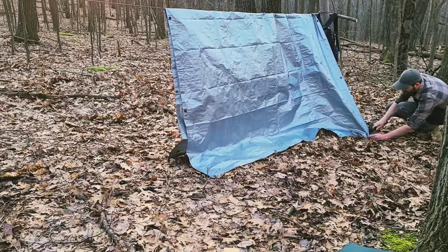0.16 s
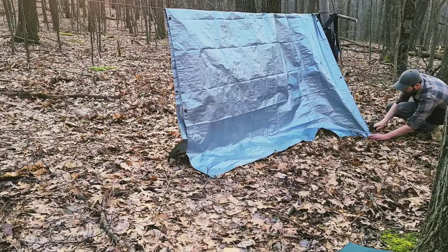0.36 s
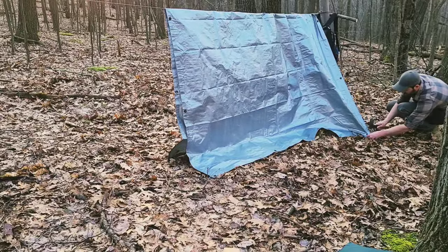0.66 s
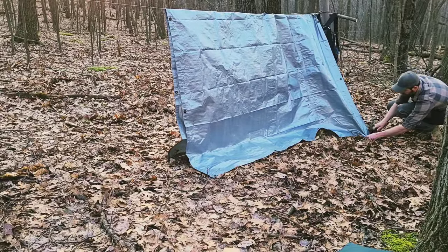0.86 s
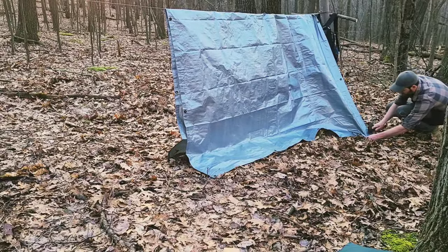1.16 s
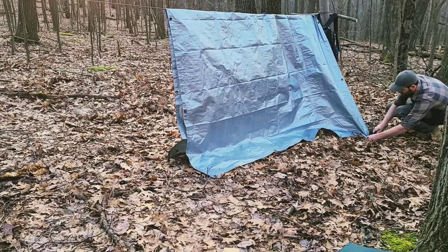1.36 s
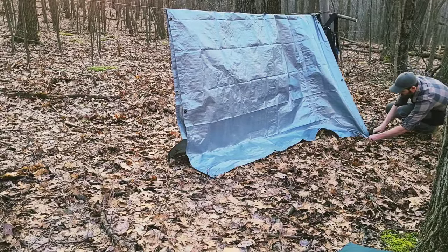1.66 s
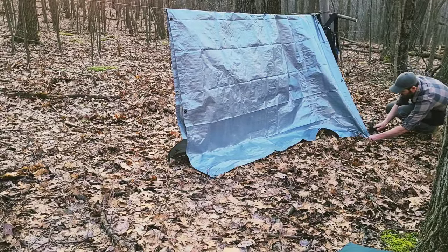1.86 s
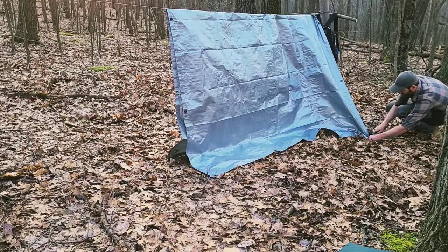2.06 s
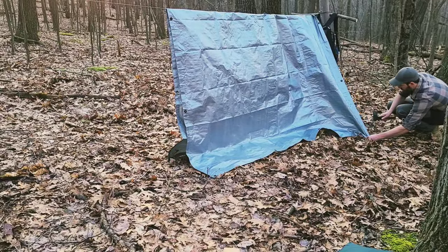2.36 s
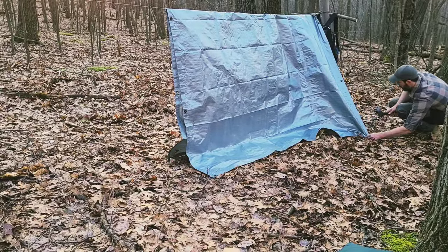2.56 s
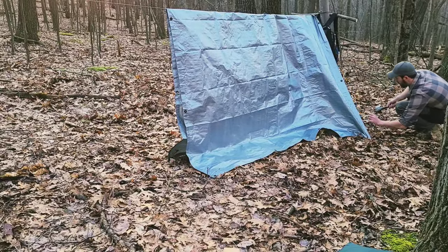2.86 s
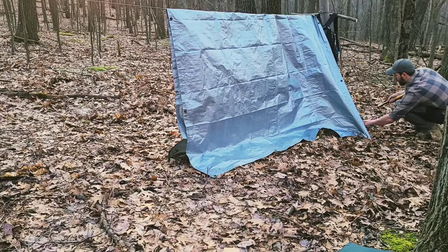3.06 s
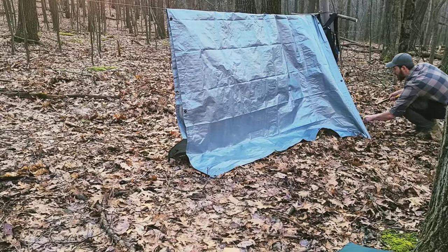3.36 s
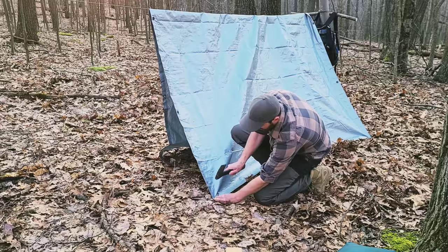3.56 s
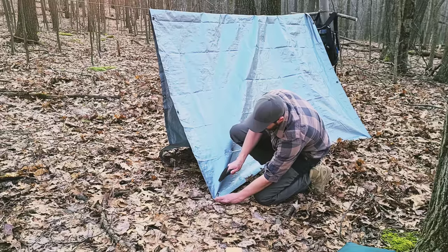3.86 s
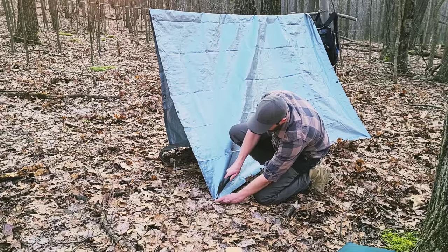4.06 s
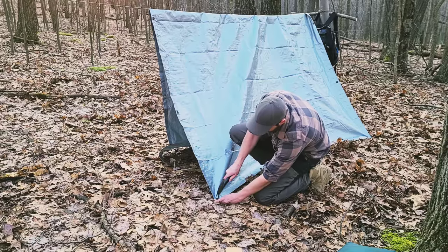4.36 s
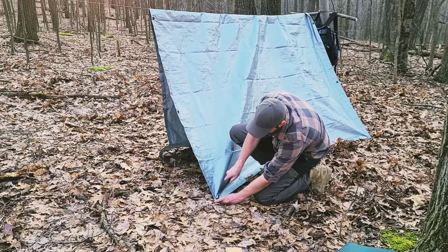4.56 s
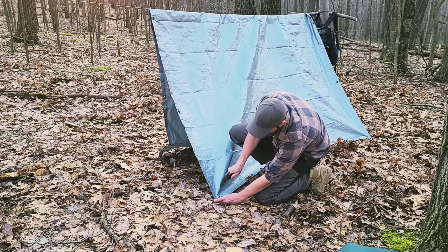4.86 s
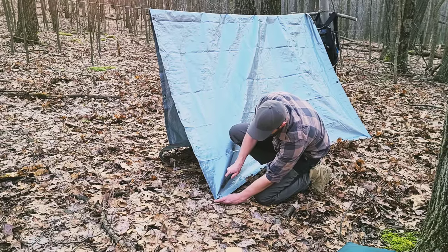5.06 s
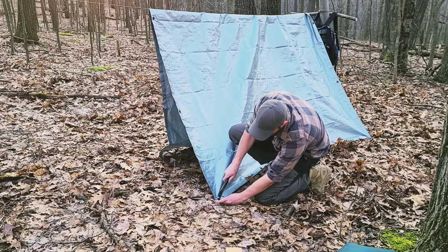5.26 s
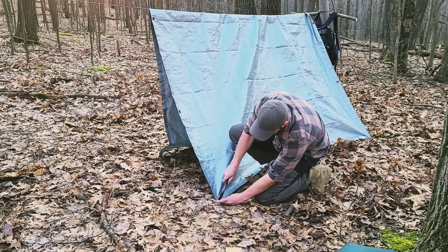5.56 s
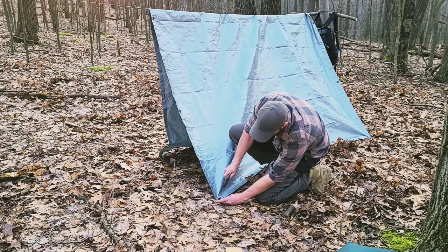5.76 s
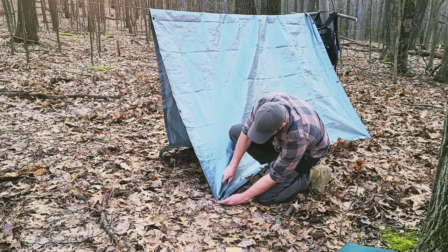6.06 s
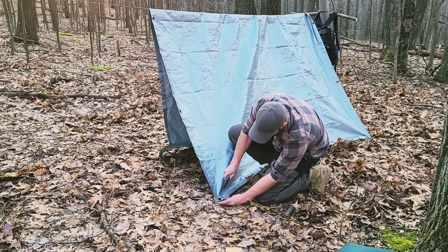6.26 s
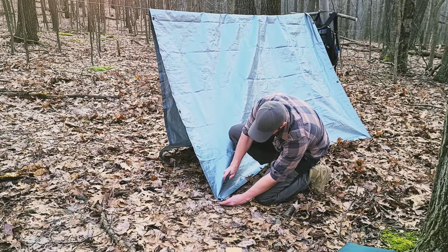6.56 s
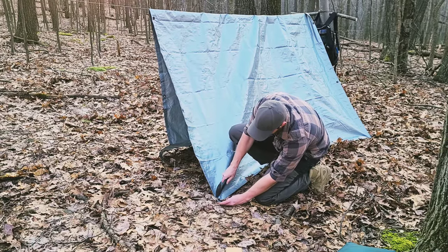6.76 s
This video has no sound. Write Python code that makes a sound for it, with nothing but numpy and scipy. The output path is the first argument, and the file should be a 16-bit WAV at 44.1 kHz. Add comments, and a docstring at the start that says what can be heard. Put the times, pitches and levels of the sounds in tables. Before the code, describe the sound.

A hatchet hammers two metal stakes into the ground outdoors, hard ringing clacks first, then nearer earthy knocks, with dry leaf rustle and light wind.

```python
"""On a leafy forest floor the back of a hatchet drives in two metal tarp stakes, a far one on the right, then a near one.
Each blow is chattering contact noise that excites damped modes: a clack, a bright edge, a dull knock and a faint ring.
Slow wave packets thump in the soil; decaying noise is the scatter from the ground and the tree trunks.
Uneven noise grains rustle as dry leaves, and low filtered noise is a light breeze buffeting the microphone."""
import sys
import numpy as np
from scipy import signal
from scipy.fft import rfft, irfft
from scipy.io import wavfile

SR = 44100
rng = np.random.default_rng(int(sys.argv[2]) if len(sys.argv) > 2 else 0)


def wav_out(sig):
    """Save sig, one row per channel (or a flat mono array), as 16-bit PCM at SR to the path in sys.argv[1]."""
    wavfile.write(sys.argv[1], SR, np.round(np.clip(np.atleast_2d(sig).T, -1, 1) * 32767).astype(np.int16))


N = 304731  # length of the scene in samples
T = np.arange(2 ** 14) / SR  # time axis of one short sound [s]
NEAR_FROM_S = 3.45  # blows before this fall on the far stake, later ones on the near stake
FIRM_FORCE_DB = -26  # force of a firm blow, to which the bright parts refer
DIRECT_WIDTH = .25  # side over mid of the contact noise and the ground scatter


# hatchet blows; the stake's resonances shift as it sinks, and the soil resists more or less:
# (time [s], knock [Hz], stake [Hz], edge [Hz], force [dB], knock [dB], ground scatter [dB],
# soil thump [dB], ring [dB]); levels are references that each layer offsets
HATCHET_BLOWS = [(0.1615, 2150, 3085, 5250, -23.5, -40, -50, -46, -46.5),
                 (0.4704, 927, 2750, 5950, -23, -27.5, -30.5, -42, -40),
                 (0.7896, 1800, 2560, 6660, -53.5, -58, -48.5, -54, -55),
                 (1.1326, 1230, 3040, 5830, -29.5, -43, -36.5, -43.5, -46),
                 (1.4308, 1176, 2750, 6140, -21.5, -23.5, -28.5, -34, -46),
                 (1.7527, 1720, 3230, 6180, -17.5, -23, -24.5, -35.5, -38.5),
                 (2.0942, 1340, 2960, 7010, -18, -22, -29, -33.5, -56),
                 (2.7968, 1006, 3490, 6500, -56, -58.5, -66.5, -55, -79),
                 (4.0709, 1270, 3345, 6160, -26.5, -35.5, -50, -31, -63),
                 (4.3499, 1340, 2930, 4330, -24.5, -33, -46, -33, -61),
                 (4.6528, 1780, 3440, 5880, -21, -27, -40, -28, -52.5),
                 (5.0304, 1450, 3730, 5730, -46, -45, -64, -39.5, -82.5),
                 (5.262, 1820, 3400, 6020, -29, -29, -38.5, -33.5, -63.5),
                 (5.571, 1365, 2950, 5000, -24, -35.5, -45.5, -34.5, -51),
                 (5.931, 1714, 3270, 5320, -46.5, -49, -68, -43.5, -69),
                 (6.1452, 2070, 3300, 4700, -25, -33, -45, -36.5, -50.5),
                 (6.431, 2030, 2730, 4020, -24.5, -33, -42, -34, -55),
                 (6.723, 1335, 3540, 6320, -26, -27, -34, -44, -48)]


def hammering():
    """Superposition: the blows on both stakes add up."""
    out = np.zeros((2, N))
    for s, *settings in HATCHET_BLOWS:
        far = s < NEAR_FROM_S
        add(out, s, place(blow(far, *settings), far))
    return out


def blow(far, knock_hz, stake_hz, edge_hz, force_db, knock_db, scatter_db, thump_db, ring_db):
    """Impact excitation: one blow drives the stake, the handle and the soil, and its echoes follow."""
    above_firm_db = force_db - FIRM_FORCE_DB
    strike = contact(0.0038, 0.00063)
    push = contact(0.0066, 0.000083)
    direct = clack(strike, stake_hz, force_db) + bright_edge(strike, edge_hz, above_firm_db)
    direct = direct + dull_knock(push, knock_hz, knock_db) + handle(push, thump_db)
    echoes = ground_scatter(scatter_db) + trunk_scatter((force_db + knock_db) / 2)
    return direct + echoes + steel_ring(far, edge_hz, ring_db, above_firm_db) + thump(thump_db)


def contact(length_s, rise_s):
    """Broadband excitation: steel chatters on the stake head and excites all pitches about equally."""
    window = (1 - np.exp(-T / rise_s)) * np.exp(-(T / length_s) ** 2)
    chatter = rfft(rng.standard_normal((2, len(T))) * window)
    flatter = irfft(chatter / np.abs(chatter) ** .5)  # square root of the magnitudes
    mid, side = flatter * np.exp(-(T / (3 * length_s)) ** 2)
    return np.array([mid + DIRECT_WIDTH * side, mid - DIRECT_WIDTH * side])


def clack(strike, stake_hz, force_db):
    """Modal resonance: the strike excites two bending resonances of the stake."""
    resonances = modes([(stake_hz, 0, .024), (3158, -3, .011)])
    sound = burst(drive(strike, resonances), force_db + 0.5)
    return colour(sound, [(500, -11.5), (2000, 1.0), (3000, -0.5), (6000, 3.5)])


# spectrum of the bright edge: (frequency [Hz], level [dB])
EDGE_SPECTRUM = [(2500, -52.5), (4000, 3.5), (4800, 6.5), (6800, 3), (8000, -6.5), (9000, -14.5),
                 (11500, -5.5), (15500, -13)]


def bright_edge(strike, edge_hz, above_firm_db):
    """Hard contact: steel on steel gives a bright crack with one high resonance."""
    edge_db = 0.75 * above_firm_db  # growth in dB per dB of force
    sizzle = scatter(.002, .12, 1.0, 2.3)  # the crack's sizzle in the leaves
    crack = colour(contact(0.005, 0.00027) + 0.041 * sizzle, EDGE_SPECTRUM)
    resonance = colour(drive(strike, modes([(edge_hz, 0, .014)])), EDGE_SPECTRUM)
    return burst(crack, edge_db - 29.5) + burst(resonance, edge_db - 32)


# spectrum of the knock: (frequency [Hz], level [dB])
KNOCK_SPECTRUM = [(100, -29), (280, -11.5), (520, -16), (900, -6.5), (1500, -5.5), (2200, -6), (4000, -8.5),
                  (10000, -37.5)]


def dull_knock(push, knock_hz, knock_db):
    """Damped resonance: the soil's resistance gives a dull knock with one broad resonance."""
    resonance = drive(contact(0.0018, 0.00035), modes([(knock_hz, 0, .02)]))
    body = burst(colour(push, KNOCK_SPECTRUM), knock_db - 2)
    return body + burst(colour(resonance, KNOCK_SPECTRUM), knock_db - 4.5)


# modes of the hatchet's wooden handle: (frequency [Hz], level [dB], t60 [s])
HANDLE_MODES = [(380, -4.5, 0.0095), (736, 1.5, 0.014)]


def handle(push, thump_db):
    """Modal resonance: the push excites the handle's damped modes."""
    return burst(drive(push, modes(HANDLE_MODES)), thump_db - 7)


# waves in the soil, the shorter ones arrive later:
# (frequency [Hz], level [dB], arrival [s], length [s])
SOIL_WAVES = [(69, -5, 0.018, 0.014), (116, 1.5, 0.019, 0.005), (209.6, -9, 0.022, 0.011)]


def thump(db):
    """Elastic recoil: the soil gives way and springs back; its waves pass as short swells."""
    waves = 0
    for hz, wave_db, arrival_s, length_s in SOIL_WAVES:
        envelope = np.exp(-((T - arrival_s) / length_s) ** 2)
        waves = waves + undb(wave_db) * envelope * np.cos(2 * np.pi * hz * (T - .017))
    shudder = scatter(0.0042, 0.13, 0.081, 0.73)
    shudder = colour(shudder, [(40, -6.5), (110, 9.5), (230, 0.0), (450, -13.0), (1500, -59.5)])
    return burst(waves * (1 - np.exp(-T / 0.002)), db - 0.7) + burst(shudder, db - 5)


# ring of the steel, completed by each blow's edge resonance: (frequency [Hz], level [dB], t60 [s])
STEEL_MODES = [(2600, -24, .02), (2840, -6, .016), (3402, 5.5, 0.022), (3490, 2.5, 0.0073),
               (3660, -15, .014)]
# overtones that an off-centre blow wakes: (frequency [Hz], level [dB], t60 [s])
STEEL_OVERTONES = [(4940, 11.5, 0.022), (7650, 4, 0.011), (10420, -6, 0.015), (9900, 2.5, 0.026),
                   (9700, -20, .008)]


def steel_ring(far, edge_hz, ring_db, above_firm_db):
    """Free vibration: the steel rings on, its overtones moving a little with the spot that is hit."""
    shift = 1 + 0.026 * rng.standard_normal()
    shifted = [(hz * shift, db, t60) for hz, db, t60 in STEEL_OVERTONES]
    overtones_db = (-63.5 if far else -55.5) + .7 * above_firm_db  # growth in dB per dB of force
    steel = ring(STEEL_MODES + [(edge_hz, -4, .018)], 0.45, ring_db + 5)
    return steel + ring(shifted, 0.38, overtones_db)


def ring(rows, t60, db):
    """Modal resonance and diffusion: modes vary at each touch and smear by reflection among the trees."""
    touched = []
    for hz, mode_db, decay in rows:
        varied_hz = hz * (1 + 0.015 * rng.standard_normal())
        touched.append((varied_hz, mode_db + 2 * rng.standard_normal(), decay))
    return burst(drive(scatter(0.0022, t60, 0.55, 1.1), modes(touched)), db)


# spectrum of the ground's reflections: (frequency [Hz], level [dB])
GROUND_SPECTRUM = [(90, -6), (250, -5.5), (520, -9.5), (1100, -4.5), (1800, -7), (3000, -1), (4500, -16),
                   (7000, -16), (9000, -28.5), (15000, -28.5)]


def ground_scatter(db):
    """Early scattering: the ground close by answers with a short, narrow cloud of reflections."""
    return burst(colour(scatter(0.0096, 0.13, DIRECT_WIDTH, 5.8), GROUND_SPECTRUM), db + 4.5)


# spectrum of the trunks' reflections: (frequency [Hz], level [dB])
TRUNK_SPECTRUM = [(150, -4), (500, -6.5), (1100, -7.5), (2000, -7.5), (3000, 0.5), (4500, -7.5), (7000, -9),
                  (9000, -26), (15000, -27.5)]


def trunk_scatter(db):
    """Late scattering: the tree trunks answer with a longer and wider cloud of reflections."""
    return burst(colour(scatter(0.007, 0.78, 1.0, 4.5), TRUNK_SPECTRUM), db - 19)


def scatter(rise_s, t60, width, grain_db):
    """Diffuse reflection: a cloud of small reflections of uneven size builds up and dies away."""
    grains = noise(len(T), width) * undb(grain_db * rng.standard_normal(len(T)))
    return grains * fade(t60) * (1 - np.exp(-T / rise_s))


# left minus right of the blows at the microphone pair: (frequency [Hz], level difference [dB])
LEFT_OVER_RIGHT = [(60, -1), (1000, -1), (3000, 0), (4800, -0.5), (8000, 6.5), (12000, 2)]
# change of colour from the near stake to the far one, over leaf litter: (frequency [Hz], level [dB])
DISTANCE_COLOUR = [(65, 6), (110, 7.5), (170, -1.5), (400, 1.5), (700, 2.5), (1100, 5.5), (3000, -2),
                   (5500, -0.5), (9000, -8.5), (15000, -6)]
# how far the left microphone leads the right, for each stake: (frequency [Hz], phase [rad])
FAR_LEAD = [(0, 0), (700, -.3), (2500, -1.5), (3600, -2.0), (4600, -4.0), (7500, -6.2), (16000, -6.3)]
NEAR_LEAD = [(0, 0), (700, .03), (3500, .6), (7500, .7), (16000, .3)]


def place(sound, far):
    """Interaural cues: the far stake is recoloured and leads on the right; left is brighter for both."""
    if far:
        sound = colour(sound, DISTANCE_COLOUR)
    hz = np.arange(len(T) // 2 + 1) * SR / len(T)
    lead = np.interp(hz, *np.transpose(FAR_LEAD if far else NEAR_LEAD))
    left = np.sqrt(gains(LEFT_OVER_RIGHT, len(T))) * np.exp(.5j * lead)
    return irfft(rfft(sound) * np.array([left, 1 / left])) * (T < .35)  # ends at 0.35 s


# a stake touches the hatchet: (frequency [Hz], level [dB], t60 [s])
CLINK_MODES = [(2980, 3, 0.022), (3440, -1, 0.012), (3630, -8, .008), (5370, -3, 0.012)]


def clink():
    """Free vibration: a light touch of steel on steel rings briefly."""
    return ring(CLINK_MODES, 0.88, -49.5)


# spectrum of the dry leaves: (frequency [Hz], level [dB])
LEAF_SPECTRUM = [(500, -5.5), (1500, -1.5), (3000, -2), (7000, 3), (8500, -20), (12000, -13), (15000, -19),
                 (16000, -26)]
# leaves and tarp stirred by hands and knees: (time [s], half length [s], level [dB])
LEAF_STIRS = [(0.796, 0.068, -60.5), (1.756, 0.074, -55), (3.224, 0.15, -68), (3.744, 0.056, -59.5),
              (4.908, .06, -69.5), (5.35, 0.073, -82), (6.155, 0.041, -52.5)]


def rustle():
    """Granular noise: a dense crackle of dry leaves swells with each stir."""
    grains = noise(N, 0.93) * undb(7.8 * rng.standard_normal(N))
    stirring = undb(-74.5)  # faint crackle between stirs
    for s, half_s, db in LEAF_STIRS:
        stirring = stirring + undb(db) * swell(s, half_s)
    return level(colour(grains, LEAF_SPECTRUM), 0) * stirring


# twigs, leaves and the stake shifting in the litter:
# (time [s], level [dB], centre frequency [Hz], t60 [s])
LITTER_SNAPS = [(.804, -43, 1430, 0.061), (0.924, -53.5, 1700, 0.033), (0.9396, -54.5, 2890, 0.031),
                (4.295, -59, 1230, .04), (5.3435, -55, 6240, 0.013), (6.078, -57.5, 1140, 0.046),
                (6.133, -47.5, 6000, .045), (6.175, -44, 3800, 0.04), (6.376, -54, 1490, 0.13)]


def snaps():
    """Band-limited impulses: louder snaps in the litter, each a decaying burst around one pitch."""
    out = np.zeros((2, N))
    for s, db, hz, t60 in LITTER_SNAPS:
        snap = colour(scatter(0.00015, t60, 0.57, 8.4), [(hz / 5, -16), (hz, 0), (hz * 4, -16)])
        add(out, s, burst(colour(snap, [(7000, -4.0), (8500, -21.0)]), db))
    return out


# spectrum of the forest's hush: (frequency [Hz], level [dB])
FOREST_SPECTRUM = [(100, -25), (170, -6), (400, -8.5), (643, -17), (778, -14), (872, -13.5), (1540, -13.5),
                   (1980, -18.5), (2170, -17.5), (2840, -11.5), (4390, -22), (7060, -18), (9040, -46),
                   (12300, -27.5), (16000, -31)]


def hush():
    """Stationary noise: the steady hush of the forest."""
    return level(colour(noise(N, 0.65), [(30, -46.5)] + list(FOREST_SPECTRUM)), -63.5)


# spectrum of the wind at the microphone: (frequency [Hz], level [dB])
WIND_SPECTRUM = [(20, -2), (45, 10), (75, 8.5), (110, -3.5), (170, -23), (300, -29.5), (800, -75)]
# strength of the breeze at the microphone, dying down: (time [s], level [dB])
BREEZE_STRENGTH = [(0, -41), (.8, -52.5), (1.15, -40), (1.55, -45.5), (2.05, -45), (2.25, -55),
                   (2.55, -47.5), (3.3, -51.5), (3.55, -57), (6.9, -57.5)]
# gusts on top of it: (time [s], level [dB])
BREEZE_GUSTS = [(.06, -49), (1.061, -30), (2.43, -43.5), (2.92, -39.5), (2.99, -37)]


def breeze():
    """Turbulent pressure: low noise buffets the microphone, with short gusts."""
    strength = undb(curve(BREEZE_STRENGTH))
    for s, db in BREEZE_GUSTS:
        strength = strength + undb(db) * swell(s, 0.018)
    return level(colour(noise(N, 0.61), WIND_SPECTRUM), 0) * strength


def undb(db):
    """Logarithmic level: decibels to gain."""
    return 10 ** (np.asarray(db) / 20)


def curve(rows):
    """Linear interpolation: rows (time [s], value) joined by straight lines."""
    return np.interp(np.arange(N) / SR, *np.transpose(rows))


def swell(s, half_s):
    """Gaussian envelope: a smooth rise and fall around a moment."""
    return np.exp(-((np.arange(N) / SR - s) / half_s) ** 2)


def gains(points, size):
    """Log-frequency interpolation: a (frequency [Hz], level [dB]) spectrum on a transform's bins."""
    hz, db = np.transpose(points)
    bins_hz = np.arange(size // 2 + 1) * SR / size
    return undb(np.interp(np.log(bins_hz + 1), np.log(hz), db))


def colour(x, points):
    """Minimum phase: a causal filter with the given spectrum, by folding its cepstrum."""
    size = 4096
    cepstrum = irfft(np.log(gains(points, size)))
    cepstrum[1:size // 2] *= 2
    cepstrum[size // 2 + 1:] = 0
    return drive(x, irfft(np.exp(rfft(cepstrum))))


def level(x, db):
    """Mean power: set the rms level."""
    return x * undb(db) / np.sqrt(np.mean(x ** 2))


def burst(x, db):
    """Energy: set a short sound's energy to that of 10 ms at this level."""
    return level(x, db) * np.sqrt(.01 * SR / x.shape[-1])


def fade(t60):
    """Exponential decay: 60 dB down after t60 seconds."""
    return np.exp(-np.log(1000) * T / t60)


def modes(rows):
    """Modal sum: impulse response of damped sinusoids (frequency [Hz], level [dB], t60 [s])."""
    return sum(undb(db) * fade(t60) * np.sin(2 * np.pi * hz * T) for hz, db, t60 in rows)


def drive(force, response):
    """Convolution: pass a force through an impulse response."""
    return signal.oaconvolve(force, response[None], axes=-1)[:, :force.shape[-1]]


def noise(size, width):
    """Mid-side stereo: Gaussian noise whose width is side over mid."""
    mid, side = rng.standard_normal((2, size))
    return np.array([mid + width * side, mid - width * side])


def add(out, s, sound):
    """Superposition: mix a sound in at a time."""
    start = max(int(s * SR), 0)
    out[:, start:start + sound.shape[-1]] += sound[..., :N - start]


def scene():
    """Superposition: blows and a clink over leaves, hush and breeze."""
    out = hammering() + rustle() + snaps() + hush() + breeze()
    add(out, 3.494, clink())
    return out


def record(dry):
    """Band limiting: the recorder cuts the top above 15.8 kHz."""
    return signal.sosfilt(signal.ellip(8, .2, 70, 15800, fs=SR, output="sos"), dry)


dry = scene()
out = record(dry)
wav_out(out)
```